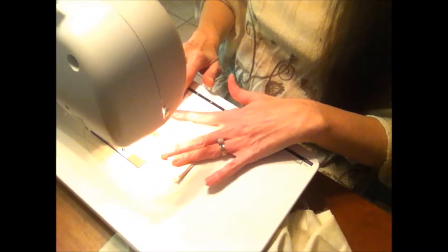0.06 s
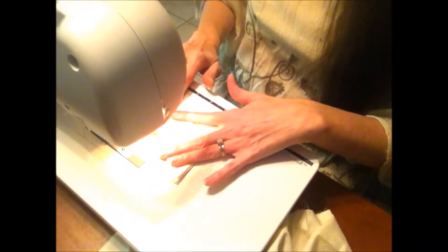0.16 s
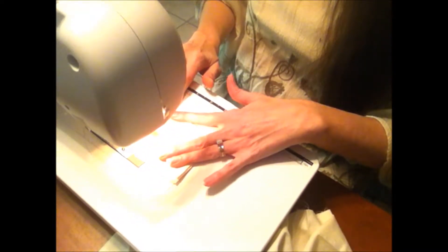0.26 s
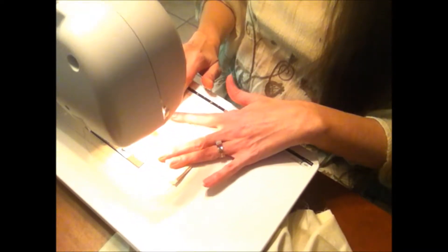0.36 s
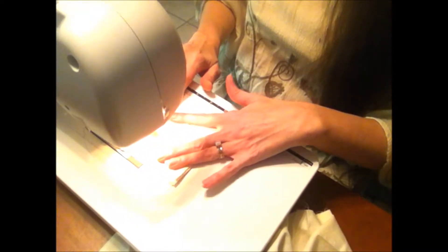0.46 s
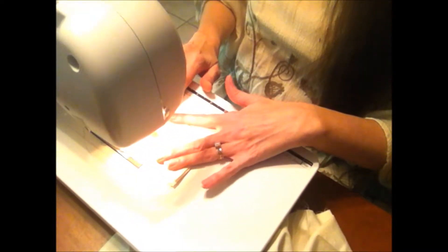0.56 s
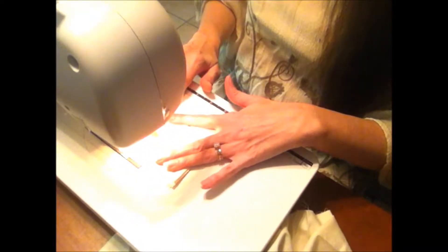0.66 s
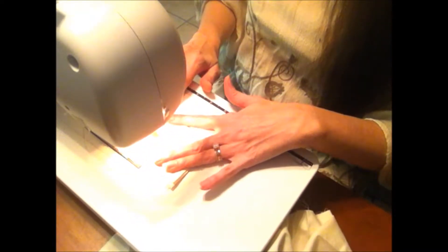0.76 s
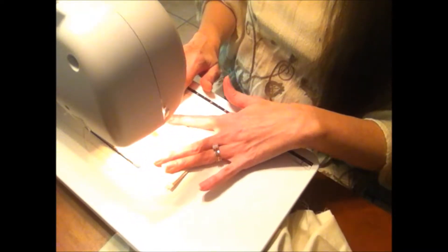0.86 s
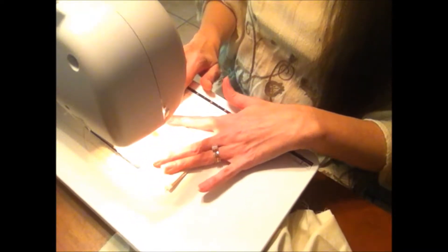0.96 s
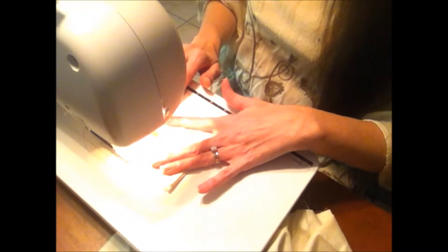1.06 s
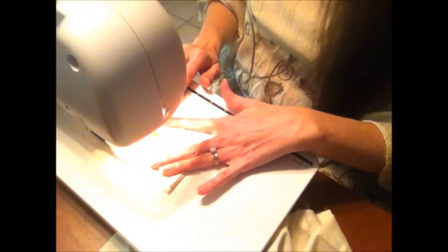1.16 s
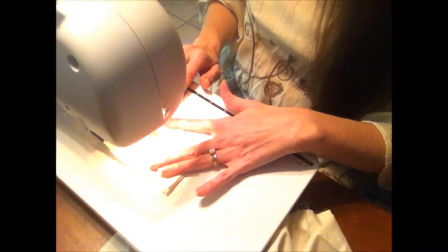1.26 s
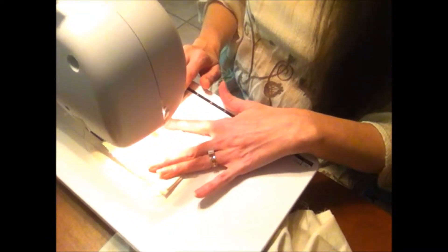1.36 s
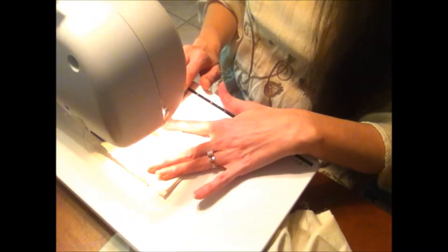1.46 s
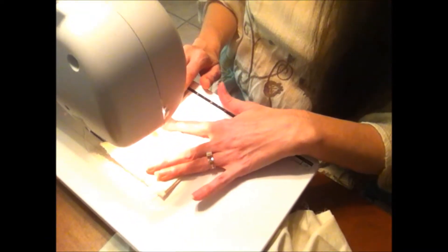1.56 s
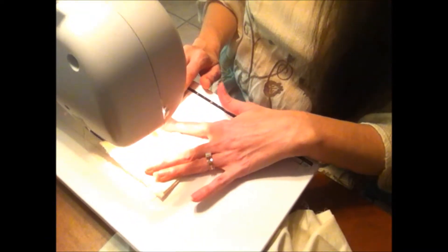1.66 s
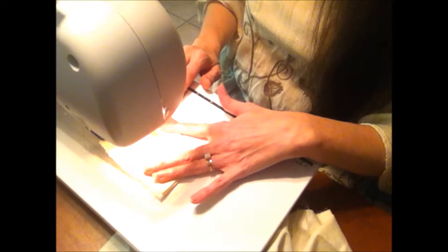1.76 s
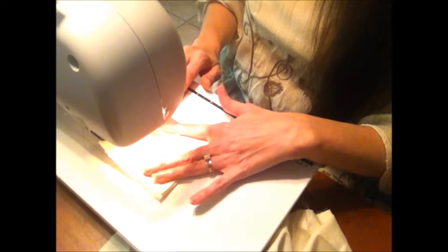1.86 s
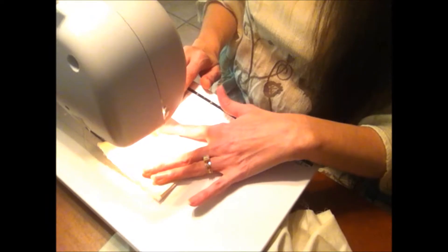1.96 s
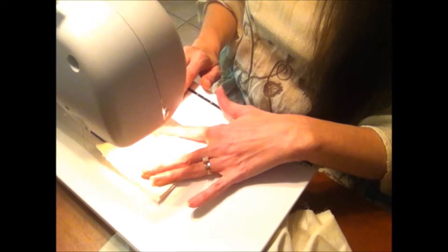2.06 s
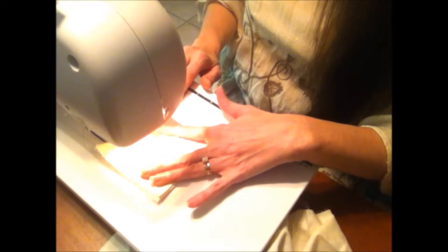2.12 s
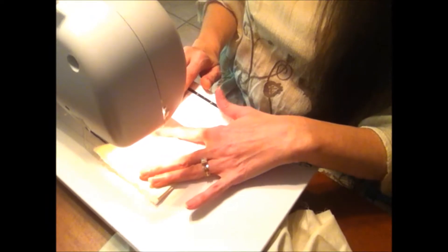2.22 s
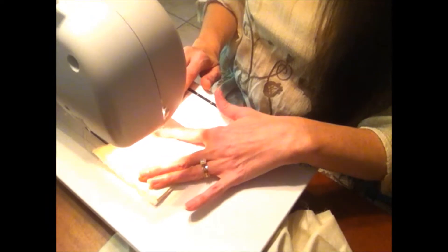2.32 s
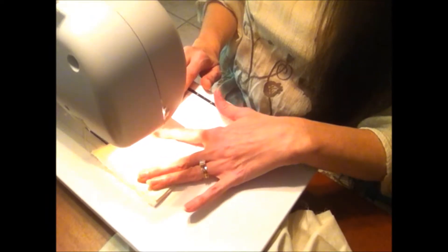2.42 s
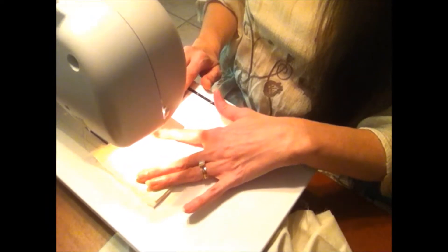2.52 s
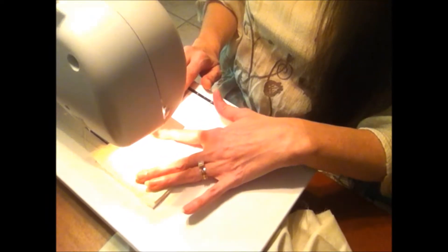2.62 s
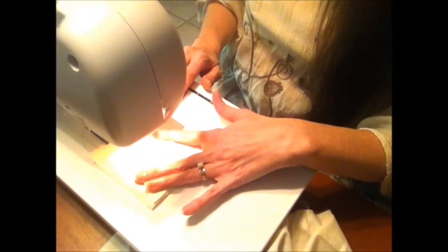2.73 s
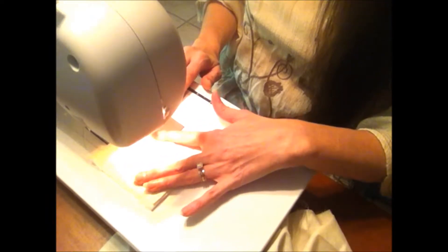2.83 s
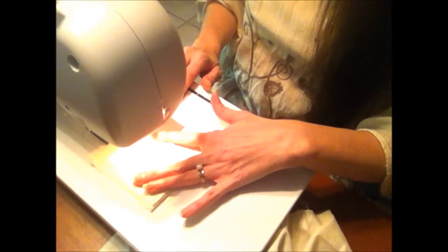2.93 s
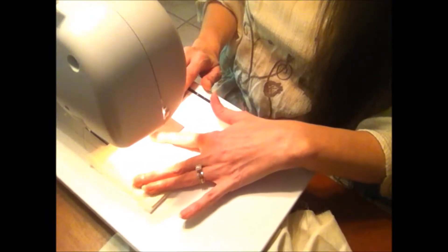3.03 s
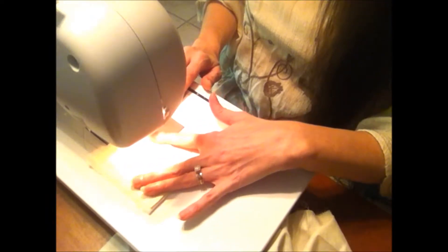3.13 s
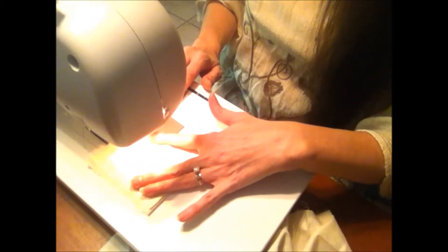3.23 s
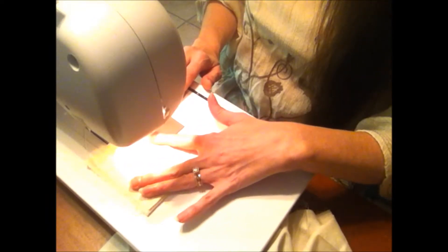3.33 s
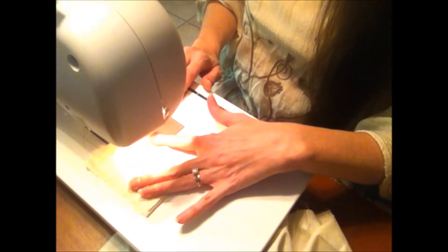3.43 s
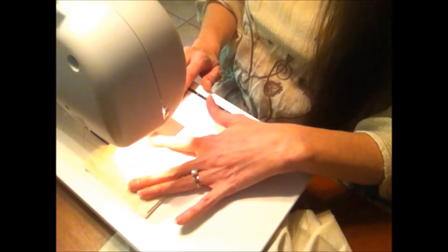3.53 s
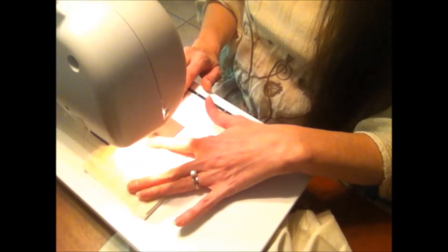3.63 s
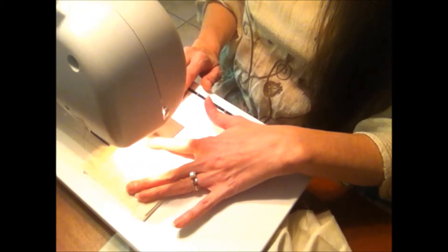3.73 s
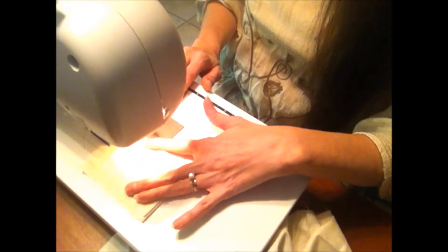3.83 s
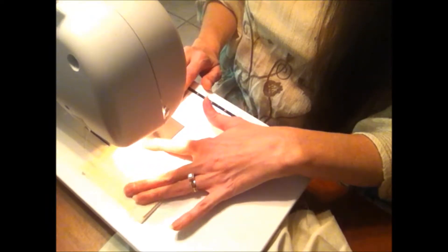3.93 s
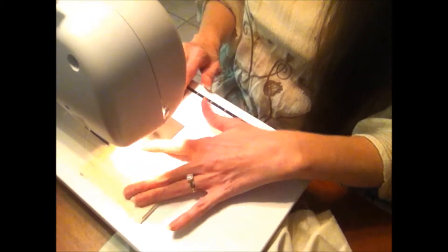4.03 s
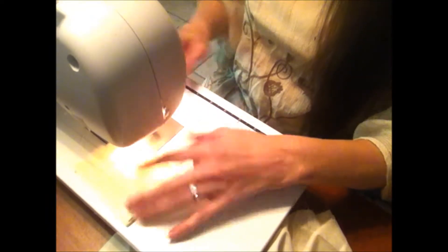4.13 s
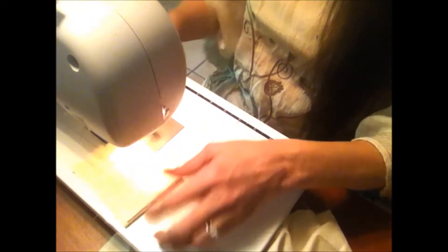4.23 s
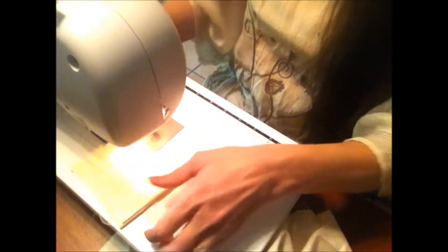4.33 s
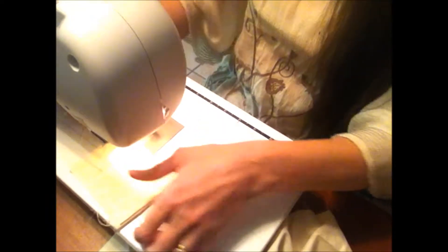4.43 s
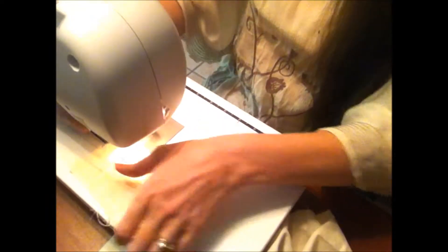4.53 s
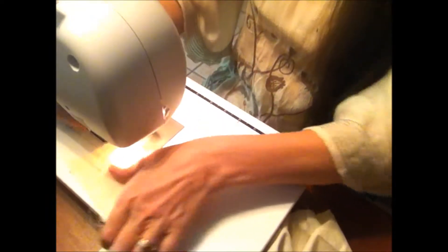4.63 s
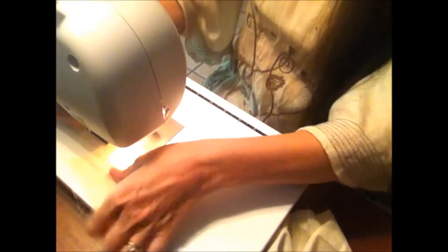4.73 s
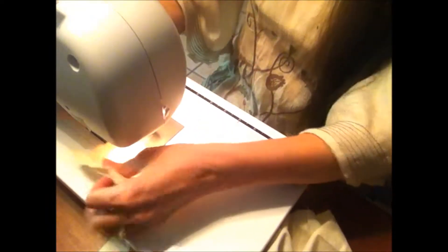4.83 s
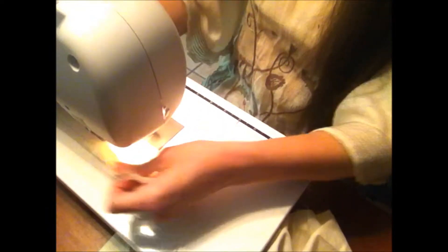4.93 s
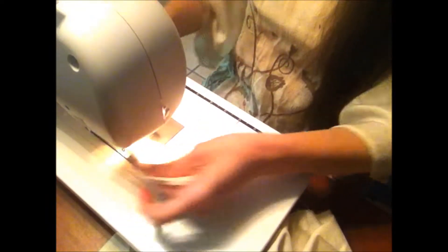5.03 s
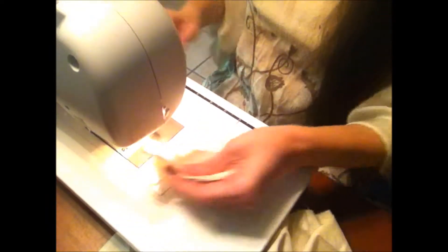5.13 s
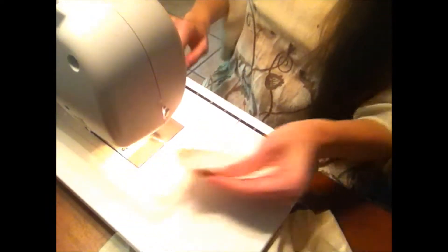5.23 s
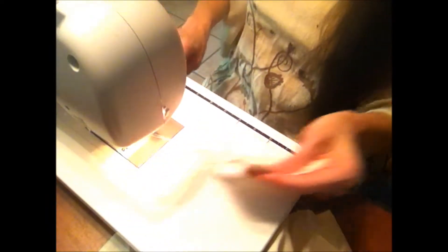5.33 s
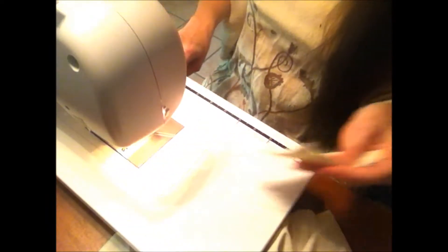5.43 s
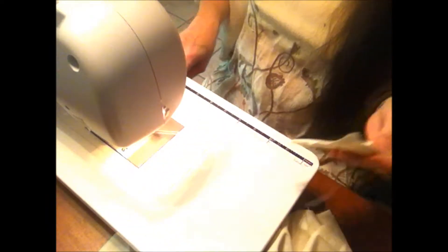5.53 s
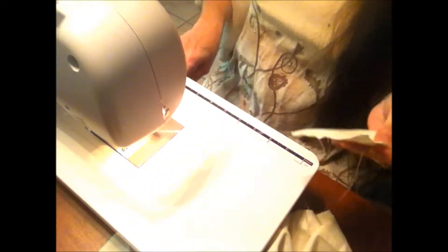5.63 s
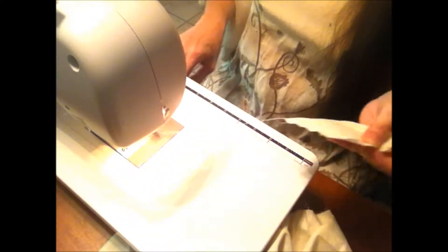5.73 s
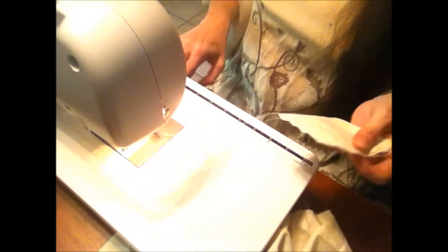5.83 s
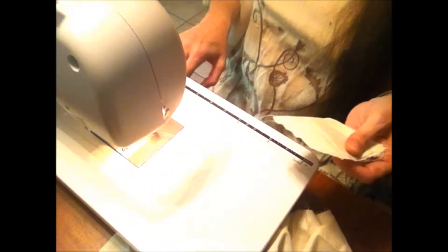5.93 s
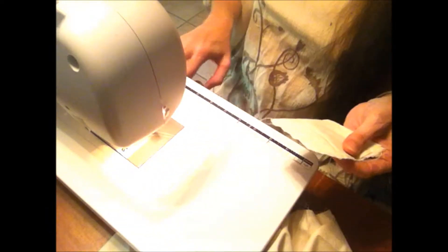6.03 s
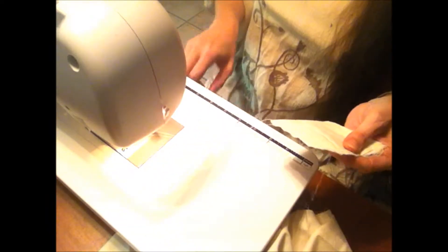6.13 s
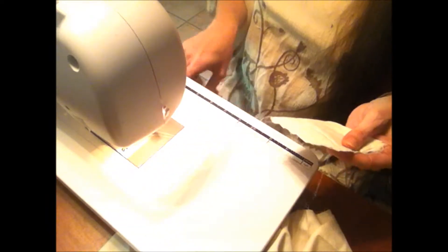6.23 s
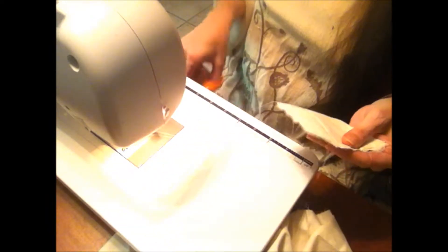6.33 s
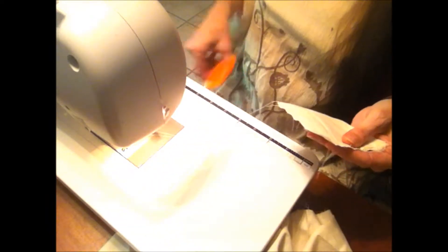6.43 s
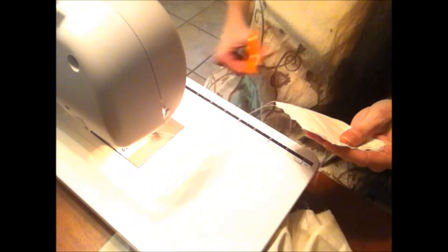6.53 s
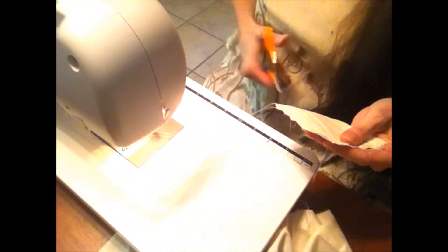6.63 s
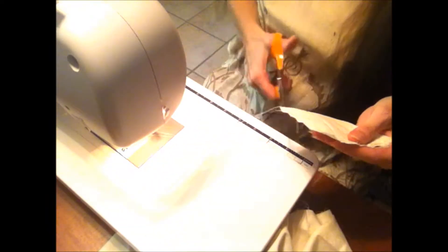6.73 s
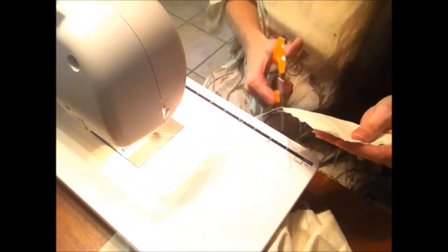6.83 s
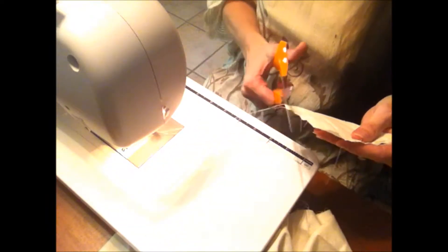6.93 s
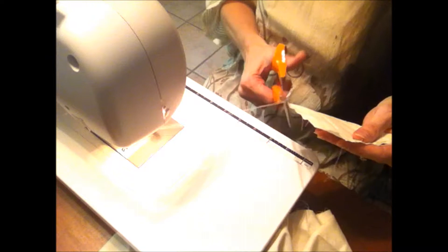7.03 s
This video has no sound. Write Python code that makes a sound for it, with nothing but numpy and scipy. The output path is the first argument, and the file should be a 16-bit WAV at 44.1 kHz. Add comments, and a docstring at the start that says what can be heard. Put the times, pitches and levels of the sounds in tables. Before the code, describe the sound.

A fast, even sewing machine clatter fills the first four seconds, with low motor hum and gear whine beneath it. The pitch falls and the knocks slow to rest in about half a second. Then it is quiet: soft fabric rubbing, light ticks, a groaning drag, a cluster of wooden table knocks with steel scrapes, and one bright scissor snip. Small indoor room, close small microphone with thin bass and soft treble.

```python
"""Sewing machine and scissors

A sewing machine runs at about eleven stitches a second, then coasts to a stop in a small room.
Each shaft turn repeats the same knocks, as bursts of coloured noise, over sine-wave hum and rattling gears.
The cloth is drawn out and scissors are dragged off the table, both made of uneven friction noise.
Knocks, bumps and clicks are short ringing bursts, and so is the last snap of the scissors."""
import sys
import numpy as np
from scipy import signal
from scipy.fft import rfft, irfft, next_fast_len
from scipy.io import wavfile

SR = 44100
rng = np.random.default_rng(int(sys.argv[2]) if len(sys.argv) > 2 else 0)


def to_wav(s):
    """Save 16-bit WAV."""
    ch = np.atleast_2d(s).T  # columns
    pcm = np.round(np.clip(ch, -1, 1) * 32767)  # PCM
    wavfile.write(sys.argv[1], SR, pcm.astype(np.int16))


N = 311787
T = np.arange(N) / SR      # time in seconds
TAIL = T[:SR // 3]         # time within one short sound, in seconds

ROOM_T60_S = 0.23          # the room's tail falls 60 dB in this time
FULL_SPEED, START_SHORTFALL = 11.525, .495   # stitches per second
CREEP_S = 1.5              # how slowly the shaft creeps up to full speed
PEDAL_OFF_S, COAST_S = 4.285, .585           # moment of letting go, length of the run-down
BACKLASH_PER_S = 150       # changes per second as parts chatter in their play

# Resonances of the casing and the needle plate.
# Each row: centre in Hz, width in Hz, height in dB.
HOUSING_MODES = [(535.5, 17.5, 6.5), (1045, 95, 8), (1165, 41, 4), (1286, 12, 7.5), (1517, 190, 9),
                 (2155, 18, 5), (2460, 63, 6), (2554, 150, 2.5), (2860, 36, 9.5), (3230, 78, 3.5),
                 (3730, 53, 4.5), (4080, 75, 7), (4390, 56, 2.5), (4640, 79, 7.5), (6060, 41, -3),
                 (6570, 660, 4), (7330, 120, 4), (9270, 95, 4.5)]


def from_db(db):
    """Turn decibels into a plain factor."""
    return 10 ** (np.asarray(db) / 20)


def rms_one(x):
    """Scale a sound to an average (RMS) level of 1."""
    return x / np.sqrt(np.mean(x ** 2) + 1e-20)


def drift(rate):
    """Random wandering of RMS 1: lines joining random points, rate points per second."""
    knots = rng.standard_normal(2048)
    return rms_one(np.interp(T * rate, np.arange(len(knots)), knots))


def colour(x, db_at):
    """Filter with gain db_at(Hz) that never sounds before its input (minimum phase)."""
    size = 2 * next_fast_len(len(x) // 2 + 2048)
    gain = from_db(db_at(np.fft.rfftfreq(size, 1 / SR) + 1))
    cepstrum = irfft(np.log(gain))
    # folding the second half onto the first makes the phase minimum
    cepstrum[1:size // 2] *= 2
    cepstrum[size // 2 + 1:] = 0
    response = np.exp(rfft(cepstrum))
    return irfft(rfft(x, size) * response)[:len(x)]


def curve(points):
    """A spectrum of (Hz, dB) points joined by lines over log frequency."""
    f, db = np.transpose(points)
    return lambda hz: np.interp(np.log(hz), np.log(f), db)


def bell(centre, octaves):
    """A broad resonance with a gentle loss towards the treble; narrow ones have steep skirts."""
    def db_at(hz):
        distance = np.log2(hz / centre) / octaves
        hump = -20 * np.log10(1 + distance ** 2 / 2 + (distance / 2) ** 4)
        return hump - 10 * np.log10(1 + hz / centre)
    return db_at


def peaks(modes, hz):
    """Resonances (Hz, width in Hz, dB) that stand out from, or dip below, their surroundings."""
    return sum(db / (1 + (2 * (hz - f) / width) ** 2) for f, width, db in modes)


def blow(db_at, ring_s, room_db, rise_s=0.0003):
    """Dense modes build up, die fast and leave the room's tail; energy equals .1 s at level 1."""
    fade = from_db(-60 * TAIL / ring_s) + from_db(room_db - 60 * TAIL / ROOM_T60_S)
    rise = 1 - np.exp(-TAIL / rise_s)
    sound = colour(rng.choice([-1, 1], len(TAIL)) * fade * rise, db_at)
    return sound * np.sqrt(SR / 10 / np.sum(sound ** 2))


def add(out, s, sound):
    """Mix a sound into out at s seconds."""
    i = int(s * SR)
    if 0 <= i < N:
        out[i:i + len(sound)] += sound[:N - i]


def reflected(x):
    """Echoes from bare walls and table close by ripple the spectrum."""
    # Each row: delay in seconds, gain as a plain factor.
    reflections = [(.0023, 0.33), (.0057, 0.09), (.0094, 0.034)]
    return x + sum(gain * np.interp(T - delay, T, x, left=0) for delay, gain in reflections)


def room_air():
    """The room's steady background is noise coloured by a fixed spectrum."""
    # Each row: frequency in Hz, relative level in dB.
    room = [(24, -9.5), (45, -11), (80, -5), (125, 8), (200, -3.5), (450, -4), (900, -11), (2200, -12.5),
            (6000, -17.5), (12000, -25.5), (15000, -30)]
    return from_db(-71.5) * rms_one(colour(rng.standard_normal(N), curve(room)))


def table_top(hz):
    """The table's broad colour, in dB, with its resonances standing out."""
    # Broad colour. Each row: frequency in Hz, relative level in dB.
    table = [(60, -33), (130, -20), (210, -15.5), (420, -18), (550, -3.5), (760, -10.5), (1000, -11.5),
             (2000, -20), (3000, -22.5), (4400, -29.5), (7000, -36), (11600, -47), (15000, -67)]
    # Resonances. Each row: centre in Hz, width in Hz, height in dB.
    table_modes = [(218, 21, 11.5), (328.4, 35, 17), (555, 55, 9.5), (982, 43, 9), (1725, 140, 7.5),
                   (2230, 60, 7), (2413, 65, 9), (3064, 100, 5), (3480, 90, 2.5), (4450, 130, 11.5)]
    return curve(table)(hz) + peaks(table_modes, hz)


def table_ring(detune=0.011, spread_db=3.0):
    """The table's clean modes are fading sines, a little different at each struck spot."""
    # Each row: frequency in Hz, level in dB against the knock, ring (60 dB fall) in seconds.
    table_rings = [(210, -14, 0.1), (316.6, -15.5, 0.12), (545.4, -7, 0.12), (976, -15, 0.084),
                   (1730, -22, .04), (2390, -17, 0.044)]
    out = 0
    chances = rng.standard_normal((len(table_rings), 2))
    for (hz, db, ring_s), (shift, force) in zip(table_rings, chances):
        tone = np.sin(2 * np.pi * hz * (1 + detune * shift) * TAIL)
        mode = tone * from_db(-60 * TAIL / ring_s) * (1 - np.exp(-TAIL * hz))
        mode = mode * np.sqrt(SR / 10 / np.sum(mode ** 2))   # same energy as a blow
        out = out + from_db(db + spread_db * force) * np.sign(shift) * mode
    return out


def knocks():
    """Each knock excites the table top, rings its clean modes and adds a sharp crack."""
    # Each row: start in seconds, level in dB, dull above this Hz, ring in seconds,
    # pitch in Hz that the struck spot favours.
    knock_rows = [(5.404, -62, 2500, 0.034, 250), (5.5217, -55.5, 4000, 0.043, 600),
                  (5.543, -48, 3500, 0.035, 1980), (5.558, -52.5, 3000, .035, 1450),
                  (5.597, -51.5, 2000, 0.035, 550), (5.639, -55, 6000, 0.03, 300),
                  (5.967, -49, 1500, .04, 550), (6.1202, -39.5, 7000, 0.016, 2450),
                  (6.1411, -47.5, 7000, .045, 3500), (6.158, -46, 1200, 0.046, 560),
                  (6.328, -66, 8000, .015, 2520), (6.343, -50.5, 8980, 0.016, 2000),
                  (6.407, -51, 1487, .03, 800), (6.4176, -35, 5480, 0.04, 2390),
                  (6.4232, -39, 5500, .03, 1000), (6.4404, -38, 10900, 0.026, 3500),
                  (6.445, -42.5, 9040, .025, 2390), (6.464, -53.5, 6000, 0.024, 2610),
                  (6.4895, -33.5, 2310, 0.039, 1000), (6.5194, -48.5, 5030, .03, 1390),
                  (6.533, -45, 6500, 0.056, 3040)]
    spot_db = 6.5   # lift around the favoured pitch
    crack_db, crack_hz, crack_octaves = -20, 3600, 0.78   # crack level is against the knock
    out = np.zeros(N)
    for s, db, dull_hz, ring_s, spot_hz in knock_rows:
        # a softer contact loses more treble
        contact = lambda hz: -10 * np.log10(1 + (hz / dull_hz) ** 2)
        spot = [(spot_hz, spot_hz, spot_db), (555, 130, -8)]
        body = lambda hz: table_top(hz) + contact(hz) + peaks(spot, hz)
        add(out, s, from_db(db) * blow(body, ring_s, room_db=-10.5, rise_s=0.00079))
        add(out, s, from_db(db) * table_ring())
        crack = blow(bell(crack_hz, crack_octaves), ring_s=0.012, room_db=-10.5)
        add(out, s, from_db(db + crack_db + contact(crack_hz)) * crack)
    return out


def clicks():
    """Small hard parts of shaft, lever, thread and scissors click as short coloured bursts."""
    # Each row: start in seconds, level in dB, centre in Hz, width in octaves, ring in seconds.
    click_rows = [(3.772, -61, 4900, 1.1, .012), (4.777, -62, 2200, 0.85, 0.022),
                  (4.827, -68, 2020, .96, .04), (4.906, -66.5, 10500, 2.1, 0.038),
                  (4.932, -71, 4900, 1.4, 0.037), (4.9824, -55, 2520, 0.92, 0.026),
                  (4.986, -51.5, 800, 0.13, 0.031), (5.016, -74, 12000, .3, .015),
                  (5.028, -61.5, 4700, 0.18, 0.03), (5.183, -62, 2150, 0.88, 0.039),
                  (5.755, -68, 3850, 1.4, 0.037), (5.8074, -55, 6000, 1.7, 0.04),
                  (5.809, -50.5, 1480, 2, 0.031), (5.905, -68.5, 10500, 0.26, .02),
                  (6.037, -70, 4000, 0.59, .03), (6.5972, -56.5, 6600, 0.52, 0.011)]
    out = np.zeros(N)
    for s, db, hz, octaves, ring_s in click_rows:
        add(out, s, from_db(db) * blow(bell(hz, octaves), ring_s, room_db=-18.5))
    return out


def bumps():
    """Low, soft thuds come as the machine rocks to rest and hands land on the table."""
    # Each row: start in seconds, level in dB.
    bump_rows = [(4.785, -57.5), (4.808, -76), (5.55, -56), (5.597, -63), (5.645, -55), (5.807, -58.5),
                 (6.040, -58), (6.335, -54), (6.418, -46.5), (6.446, -49), (6.494, -47.5), (6.535, -54.5)]
    out = np.zeros(N)
    for s, db in bump_rows:
        add(out, s, from_db(db) * blow(bell(233, 0.27), ring_s=0.07, room_db=-10.0))
    return out


def scissors_snap():
    """The blades graze, the handles clap together with a sharp crack, and a low thump follows."""
    # Colour of the clap. Each row: frequency in Hz, relative level in dB.
    blades = [(76, -79), (130, -19.5), (247, 4), (375, -7.5), (607, -1.5), (819, -6.5), (1080, -1),
              (1620, 0.5), (2100, -18.5), (2770, -3), (3600, -12.5), (4480, -13), (7100, -16), (8510, -8.5),
              (15500, -59)]
    # Resonances of the scissors. Each row: centre in Hz, width in Hz, height in dB.
    blade_modes = [(3080, 270, 2), (3470, 150, -0.5), (3800, 110, 7.5), (4620, 170, 11), (6270, 220, 8),
                   (7720, 200, 4), (8600, 250, 5.5), (10500, 450, 9.5), (12100, 440, 10.5)]
    clap_colour = lambda hz: curve(blades)(hz) + peaks(blade_modes, hz)
    graze = blow(bell(5000, 1.4), ring_s=.03, room_db=-22.0)
    clap = blow(clap_colour, ring_s=0.045, room_db=-11.0)
    crack = blow(bell(3500, 2.2), ring_s=0.008, room_db=-23.0, rise_s=.00005)
    knock = blow(bell(1220, 0.27), ring_s=0.027, room_db=-31.0, rise_s=.0001)
    thump = blow(bell(340, 0.64), ring_s=0.079, room_db=-15.5)
    out = np.zeros(N)
    add(out, 6.6735, from_db(-51.5) * graze)
    add(out, 6.676, from_db(-27.5) * clap)
    add(out, 6.6762, from_db(-34.5) * crack)
    add(out, 6.676, from_db(-31.5) * knock)
    add(out, 6.689, from_db(-37.5) * thump)
    return out


def rub(db_at, grain_db, grit):
    """Friction catches and slips unevenly; grit adds sharp grains."""
    grains = rms_one((rng.random(N) < 700 / SR) * rng.standard_normal(N))   # about 700 per second
    friction = (rng.standard_normal(N) + grit * grains) * from_db(grain_db * drift(240))
    return rms_one(colour(friction, db_at))


def strokes(rows, attack_s, swell_db, release_db_per_s):
    """Strength of hand strokes: each sets in, swells to its end and dies away."""
    out = np.zeros(N)
    for start, length, db in rows:
        age = T - start
        swell = swell_db * np.minimum(age / length - 1, 0)
        release = release_db_per_s * np.maximum(age - length, 0)
        out += np.clip(age / attack_s, 0, 1) * from_db(db + swell - release)
    return out


def skips(tap_s=0.0036, size=128):
    """Steel catches and jumps at uneven intervals, each jump a small sharp tap on the table."""
    skips_per_s, range_db = 200, 10.5   # rough rate, range of the taps' strength
    gaps, force = rng.random((2, 2048))
    times = np.cumsum(.3 + 1.3 * gaps) / skips_per_s
    fade = from_db(-60 * TAIL[:size] / tap_s)
    taps = np.zeros(N)
    for s, db in zip(times, range_db * force):
        add(taps, s, from_db(db) * rng.standard_normal(size) * fade)
    tap_colour = [(3500, 3000, 4), (4430, 160, -6)]   # Hz, width in Hz, dB
    return rms_one(colour(taps, lambda hz: table_top(hz) + peaks(tap_colour, hz)))


def cloth_pulls():
    """Cloth rubs over the machine's bed, each pull swelling until the hand stops."""
    # Colour of the cloth. Each row: frequency in Hz, relative level in dB.
    cloth = [(60, -23), (110, -27), (230, -6), (330, -10), (430, -14), (620, -4), (850, -11), (1100, -20.5),
             (1500, -17.5), (2000, -26), (4500, -28.5), (10500, -37.5), (15000, -40)]
    # Each row: start in seconds, length in seconds, final level in dB.
    pulls = [(4.42, 0.35, -52.5), (4.8, 0.23, -56), (5.14, 0.33, -50.5), (5.5, .15, -50), (5.78, 0.03, -46),
             (5.85, 0.39, -65)]
    friction = rub(lambda hz: curve(cloth)(hz) + peaks(HOUSING_MODES, hz), grain_db=2.0, grit=0.46)
    strength = strokes(pulls, attack_s=0.011, swell_db=11.5, release_db_per_s=153)
    return reflected(friction * strength)


def handle_drag():
    """The scissors' plastic handles groan over the table as friction colours its ring."""
    # How dragging colours the table. Each row: centre in Hz, width in Hz, height in dB.
    drag_colour = [(555, 120, 2), (990, 90, -4), (1280, 700, 7), (4450, 2000, -5.5)]
    # Each row: start in seconds, length in seconds, final level in dB.
    drags = [(5.85, 0.13, -39)]
    friction = rub(lambda hz: table_top(hz) + peaks(drag_colour, hz), grain_db=2.0, grit=0.18)
    return friction * strokes(drags, attack_s=0.036, swell_db=4.5, release_db_per_s=175.5)


def steel_scrapes():
    """Steel rasps and skips over the table top."""
    # The added rasp. Each row: centre in Hz, width in Hz, height in dB.
    rasp = [(1210, 540, 5), (2610, 2400, -3)]
    # Each row: start in seconds, length in seconds, final level in dB of the friction.
    scrapes = [(6.125, 0.07, -49.5), (6.345, 0.05, -46.5), (6.42, 0.033, -46), (6.505, 0.033, -43)]
    friction = rub(lambda hz: table_top(hz) + peaks(rasp, hz), grain_db=0.5, grit=0.69)
    scrape = friction + from_db(-7) * skips()
    return scrape * strokes(scrapes, attack_s=0.0094, swell_db=2, release_db_per_s=329.5)


def shaft_speed():
    """Stitches per second: a slow creep up under the pedal, then friction brakes evenly to a stop."""
    driven = FULL_SPEED - START_SHORTFALL * np.exp(-T / CREEP_S)
    return driven * np.clip(1 - (T - PEDAL_OFF_S) / COAST_S, 0, 1)


def load(turns):
    """Strength of the chatter along each stitch, strongest as the needle goes in."""
    # Load on the drive. Each row: share of a turn, change in dB.
    load_rows = [(.03, 2), (.16, 0), (.27, -1), (.5, 0.06), (.63, 0.7), (.8, 0), (.88, -2), (.95, 1)]
    share, db = np.transpose(load_rows)
    return from_db(np.interp(turns, share, db, period=1))


def stitches(turns, spread_db=1.5, cloth_db=1.35, play_s=.0007, rise_share=0.03,
             bounce_s=.005, bounce_db=-6):
    """Contacts strike once a turn with varied timing, force and ring, rebound, and meet uneven cloth."""
    # Each row: share of a turn, level in dB before the drive's gain, centre in Hz,
    # width in octaves, ring in seconds.
    contacts = [(.01, -53.5, 705, 1, 0.018), (.975, -58.5, 2330, 0.79, 0.014),
                (.075, -63.5, 3420, 0.58, .02), (.09, -56, 1400, 0.55, 0.018), (.13, -54, 620, 0.22, 0.021),
                (0.241, -56, 408, 0.7, 0.027), (.06, -67, 117.6, 0.11, 0.11), (.36, -66, 114.8, 0.095, .07),
                (0.245, -55, 340, 0.21, 0.025), (.335, -74, 9100, 1, .012), (.49, -69.5, 9500, 0.5, 0.0099),
                (.46, -61.5, 342, 0.35, 0.028), (.61, -56, 1090, 0.35, 0.041),
                (0.619, -59.5, 398, 0.31, 0.033), (.715, -72, 8900, 0.46, 0.016),
                (.765, -53.5, 670, 0.14, 0.019), (.895, -63.5, 7450, 0.4, 0.035),
                (.905, -60.5, 3950, 0.65, 0.031), (.96, -62.5, 6030, 0.99, 0.014),
                (.96, -54.5, 1480, 1, 0.022), (.995, -59.5, 3560, 0.29, 0.016)]
    out = np.zeros(N)
    resistance = drift(9.8)   # the cloth resists more on some stitches
    for share, db, hz, octaves, ring_s in contacts:
        whole_turns = np.arange(np.ceil(turns[0] - share), turns[-1] - share)
        times = np.interp(whole_turns + share, turns, T)
        usual, *others = [blow(bell(hz, octaves), ring_s, room_db=-13.5, rise_s=rise_share * ring_s)
                          for _ in range(6)]
        loose = hz / (hz + 900)   # high modes vary most from stitch to stitch
        for s, (late, force, gap) in zip(times, rng.standard_normal((64, 3))):
            other = others[rng.integers(len(others))]
            sound = np.sqrt(1 - loose) * usual + np.sqrt(loose) * other
            cloth = cloth_db * loose * np.interp(s, T, resistance)
            strength = from_db(db + spread_db * force + cloth)
            add(out, s + play_s * loose * late, strength * sound)
            rebound = loose * from_db(bounce_db) * others[rng.integers(len(others))]
            add(out, s + bounce_s * 2 ** (gap / 2), strength * rebound)
    return out


def frame_rumble(turns, count=90):
    """Cams and belt teeth jolt the frame at the same angles on every turn."""
    # Colour of the frame. Each row: frequency in Hz, relative level in dB.
    frame = [(60, -24.5), (90, -26.5), (110, -14), (150, -8.5), (230, -3.5), (330, -3), (400, -12),
             (700, -2), (1200, -10), (3000, -41.5)]
    angles = (np.arange(count) + rng.random(count)) / count
    times = np.interp(np.arange(-1, turns[-1])[:, None] + angles, turns, T, left=0, right=0)
    impulses = np.zeros(N)
    strength = rng.choice([-1, 1], count) + 0.27 * rng.standard_normal(times.shape)
    impulses[(times * SR).astype(int)] = strength
    return from_db(-44.5) * rms_one(colour(impulses, curve(frame)))


def rattle(speed, per_turn=60, rough_db=1.1):
    """Loose gears and bearings chatter in the housing: random ticks plus rough noise."""
    # Colour of the housing. Each row: frequency in Hz, relative level in dB.
    housing = [(150, -34), (260, -9), (490, -9), (533, -0.5), (591, 1.5), (790, 2), (891, -10.5),
               (1570, -16), (1960, -14.5), (2530, -18.5), (4600, -23), (5190, -28), (6480, -28.5),
               (11200, -33.5), (15500, -80)]
    ticks = rms_one((rng.random(N) < per_turn * speed / SR) * rng.standard_normal(N))
    rough = from_db(rough_db * drift(160)) * rng.standard_normal(N)
    return from_db(-38.5) * rms_one(colour(ticks + 1.62 * rough, curve(housing)))


def tones(turns, orders, waver_db, gain_db=lambda k: 0):
    """Sine tones at k times the stitch rate, locked to the shaft and wavering with the load."""
    out = 0
    for k, db in orders:
        strength = np.sqrt(2) * from_db(db + gain_db(k) + waver_db * drift(13))
        out = out + strength * np.sin(2 * np.pi * (k * turns + rng.random()))
    return out


def motor_hum(turns, pace):
    """Shaft and motor hum at multiples of the stitch rate, fading steeply as they slow."""
    # Each row: multiple of the stitch rate, level in dB before the hum's gain.
    hum = [(10, -61.5), (17, -41.5), (19, -55), (20, -54.5), (21, -56.5), (24, -73), (30, -61)]
    return from_db(1) * pace ** 4.5 * tones(turns, hum, waver_db=0.44)


def gear_whine(turns, speed, pace):
    """Gear tones sweep through the casing's resonances; unloaded gears chatter in their play."""
    # Each row: multiple of the stitch rate, level in dB before casing and gain.
    gears = [(34, -49.5), (40, -57.5), (48, -50), (60, -50.5), (68, -60), (74, -54.5), (112.3, -48)]
    # How well the casing radiates a gear tone. Each row: frequency in Hz, gain in dB.
    radiation = [(70, -42), (110, -19), (150, 5), (220, 6.5), (270, 2), (390, -5), (480, 9.5), (545, -1),
                 (600, -12.5), (740, 11), (950, -18.5), (1270, -10), (1450, -25)]
    backlash_turns, unloaded_db = 0.0029, 4   # size of the play, loss once the motor stops pushing
    slack = np.clip((T - PEDAL_OFF_S) / COAST_S, 0, 1) ** .5
    loose_turns = turns + backlash_turns * slack * drift(BACKLASH_PER_S)
    casing = lambda k: curve(radiation)(k * speed + 1)
    whine = tones(loose_turns, gears, waver_db=1.0, gain_db=casing)
    return from_db(-0.65 - unloaded_db * slack) * pace ** 0.86 * whine


def motor_whirr(turns, speed):
    """The motor's whirr swells as it falls through the casing's resonances, blurred by its play."""
    # Each row: multiple of the stitch rate, resonance centre in Hz, width in octaves,
    # level in dB before that resonance.
    whirrs = [(126.2, 890, 0.24, -39), (129, 1270, .04, -40), (82.7, 560, 0.12, -44)]
    play_turns = 0.0012
    out = 0
    for order, hz, octaves, db in whirrs:
        loose_turns = turns + play_turns * drift(BACKLASH_PER_S)
        casing = lambda k: bell(hz, octaves)(k * speed + 1)
        out = out + tones(loose_turns, [(order, db)], waver_db=3.0, gain_db=casing)
    return out


def jolts():
    """The gears change flanks as the drive lets go, and the casing rings."""
    # Each row: start in seconds, level in dB, centre in Hz, width in octaves, ring in seconds.
    jolt_rows = [(4.272, -45, 766, 0.13, 0.066), (4.274, -47, 564, 0.086, 0.076),
                 (4.318, -45, 533, 0.064, 0.21)]
    out = np.zeros(N)
    for s, db, hz, octaves, ring_s in jolt_rows:
        add(out, s, from_db(db) * blow(bell(hz, octaves), ring_s, room_db=-17, rise_s=.003))
    return out


def machine():
    """Shaft speed times the stitches and tones; most parts weaken as it falls."""
    speed = shaft_speed()
    pace = speed / FULL_SPEED
    turns = -.84 + np.cumsum(speed) / SR   # shaft angle in turns, from its starting angle
    chatter = stitches(turns) + load(turns) * rattle(speed)
    clatter = colour(reflected(chatter), lambda hz: peaks(HOUSING_MODES, hz) - 1.8)
    mechanism = from_db(1) * pace ** 1.43 * (clatter + frame_rumble(turns))
    drive = gear_whine(turns, speed, pace) + motor_whirr(turns, speed) + motor_hum(turns, pace)
    return mechanism + jolts() + drive


def scene():
    """Mix the room, the handled things and the machine into one channel."""
    handling = knocks() + clicks() + bumps()
    sliding = cloth_pulls() + handle_drag() + steel_scrapes()
    return (room_air() + handling + sliding + scissors_snap() + machine())[None]


def record(dry):
    """A small microphone with weak deep bass and a soft top, then a steep cut-off."""
    bass_cut = signal.butter(2, 105, "high", fs=SR, output="sos")
    thin = signal.sosfilt(bass_cut, dry) - from_db(-16) * dry
    soft = signal.sosfilt(signal.butter(4, 12800, fs=SR, output="sos"), thin)
    cutoff = signal.ellip(10, .2, 80, 15750, fs=SR, output="sos")   # order, ripple dB, stop dB, Hz
    return signal.sosfilt(cutoff, soft)


dry = scene()
out = record(dry)
to_wav(out)
```